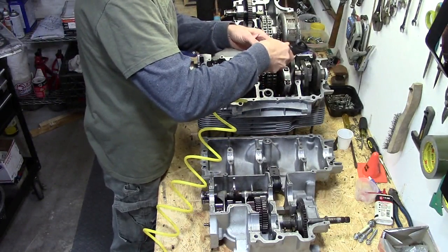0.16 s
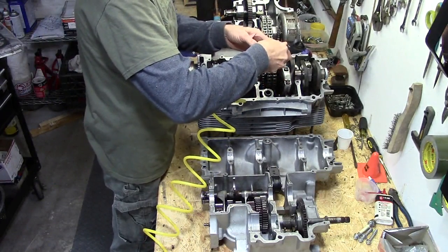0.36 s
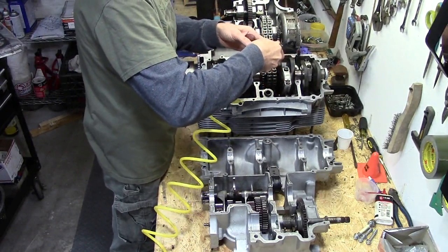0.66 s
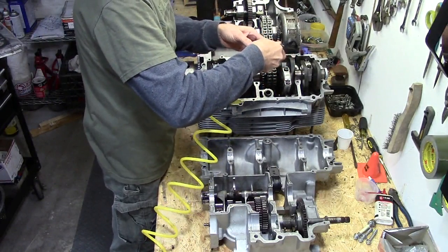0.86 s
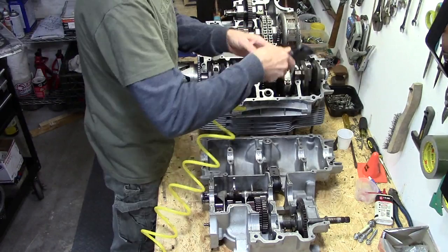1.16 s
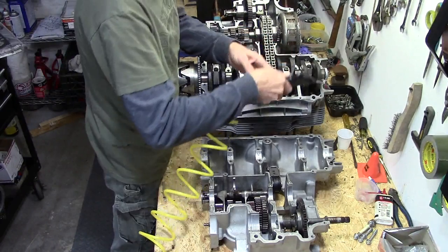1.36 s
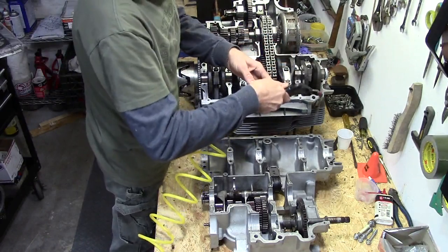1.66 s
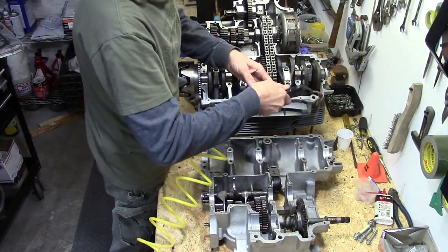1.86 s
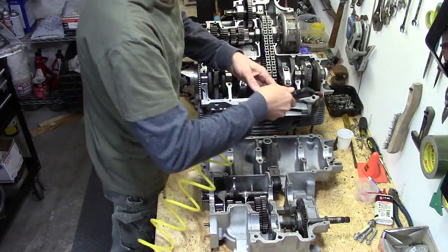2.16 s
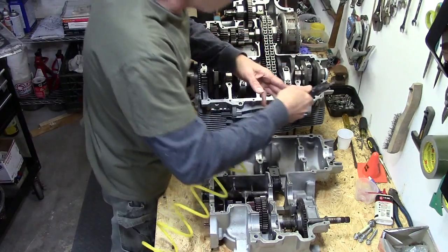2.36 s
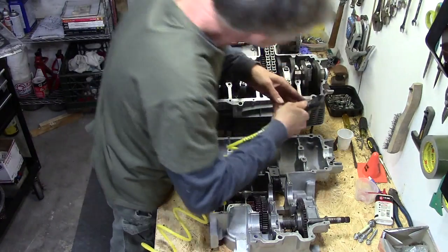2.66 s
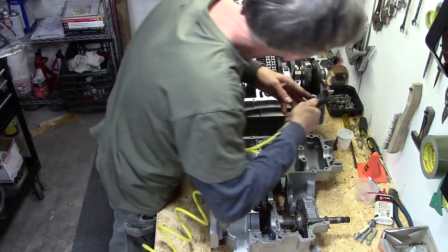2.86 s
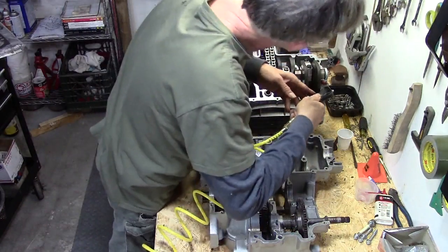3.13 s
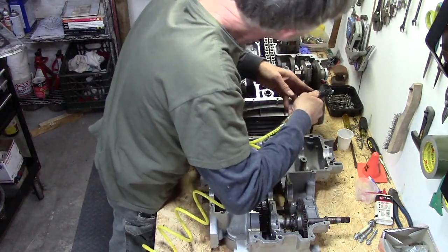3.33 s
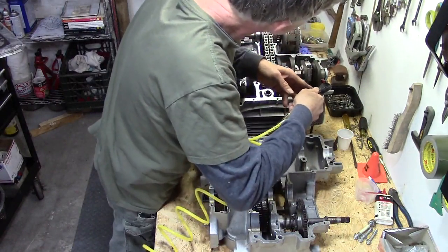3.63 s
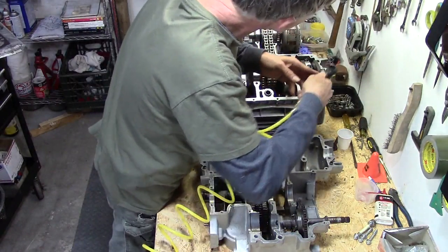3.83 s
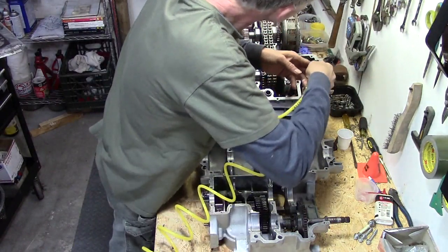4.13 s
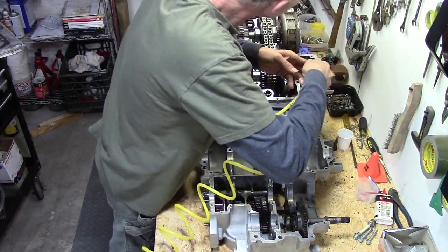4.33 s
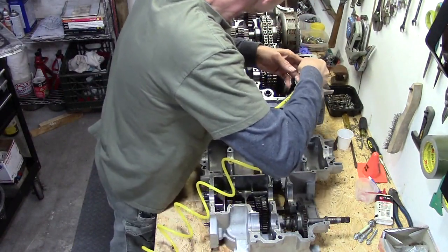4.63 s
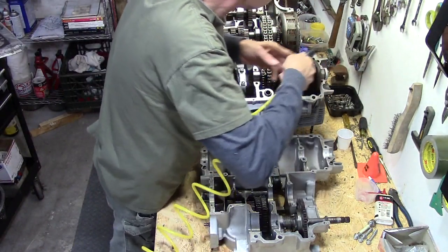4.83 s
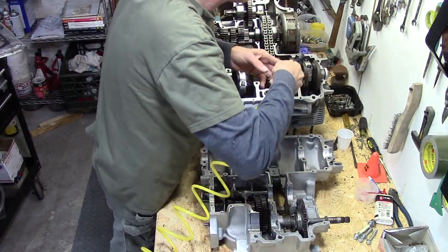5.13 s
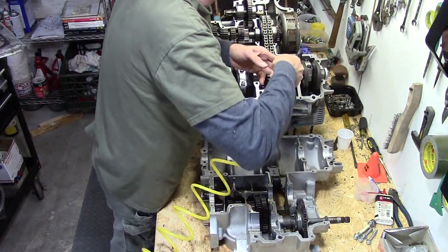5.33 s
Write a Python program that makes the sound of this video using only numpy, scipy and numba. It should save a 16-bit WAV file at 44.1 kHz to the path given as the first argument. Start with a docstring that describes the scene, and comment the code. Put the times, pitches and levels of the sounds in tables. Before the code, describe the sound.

Short blasts of compressed air hiss from a blow gun into a metal engine part, with brief whistles, in a small garage.

```python
"""Blow gun at a garage workbench

Short blasts of air clear the bores of an aluminium engine part. The jet hisses, rushes where it
strikes metal and rings the holes it crosses; square on a bore, it whistles. In the pauses a sleeve
brushes the bench and the nozzle taps the part. The small room holds each blast briefly, and the
limiter behind the stereo microphone ducks and swells back over a quiet hum."""
import sys
import numpy as np
from scipy import signal
from scipy.fft import rfft, irfft
from scipy.io import wavfile
from scipy.ndimage import uniform_filter1d, minimum_filter1d, map_coordinates
from numba import njit

SR = 44100
rng = np.random.default_rng(int(sys.argv[2]) if len(sys.argv) > 2 else 0)


def output_pcm(signal):
    """Save a mono or channel-first signal as 16-bit PCM at the path in sys.argv[1].

    Samples are clipped to [-1, 1] before scaling.
    """
    pcm = np.clip(np.atleast_2d(signal).T, -1, 1) * 32767
    wavfile.write(sys.argv[1], SR, np.round(pcm).astype(np.int16))


N = 241932
T = np.arange(N) / SR
HZ = np.maximum(np.arange(N // 2 + 1) * SR / N, 1)


def undb(db):
    """Decibels to gain."""
    return 10 ** (np.asarray(db) / 20)


def unit(x):
    """Scale to rms 1."""
    return x / np.sqrt(np.mean(x ** 2))


def curves(rows):
    """Each column after the first as a curve in time."""
    s, *columns = np.transpose(rows)
    return [np.interp(T, s, c) for c in columns]


def across(hz, points):
    """Read (Hz, value) points on a log-frequency axis."""
    f, value = np.transpose(points)
    return np.interp(np.log(hz), np.log(f), value)


def noise(gain):
    """White noise through a frequency response."""
    return irfft(rfft(rng.standard_normal(N)) * gain, N)


def resonance(hz, width_hz):
    """Response of two like resonators in series, gain 1 at the centre."""
    return 1 / (1 + 1j * (HZ ** 2 - hz ** 2) / (HZ * width_hz)) ** 2


def mode_power(modes, widen):
    """Power spectrum of a set of modes, their widths scaled."""
    return sum(np.abs(undb(db) * resonance(hz, widen * width_hz)) ** 2 for hz, width_hz, db in modes)


def walk(rate_hz):
    """Smooth random drift with a spread near 1."""
    k = int(SR / rate_hz)
    steps = np.repeat(rng.standard_normal(N // k + 1), k)
    return 1.6 * uniform_filter1d(uniform_filter1d(steps, k), k)[:N]


def bands(x, count=10):
    """Split a sound into overlapping bands that sum to it, each with its centre in Hz."""
    centres = np.geomspace(400, 16000, count)
    hz = np.maximum(np.arange(len(x) // 2 + 1) * SR / len(x), 1)
    spectrum = rfft(x)
    weights = [np.interp(np.log(hz), np.log(centres), row) for row in np.eye(count)]
    return [(centre, irfft(spectrum * weight, len(x))) for centre, weight in zip(centres, weights)]


# The nozzle's path over the part, one table a blast. Each row: time in seconds, gain from nearness
# in dB, slant in dB (negative is square on the metal, positive is grazing an edge).
AIM_SLOT = [(0.035, -2.5, 0.5), (0.075, -6.5, -4), (0.12, -2, 4), (0.165, 5.5, 0.5)]
AIM_FACE = [(0.28, -6, 0.5), (0.33, 2.5, -9.5), (0.39, 7, -5), (0.445, 9.5, 3.5), (0.52, -0.5, 1),
            (0.601, 3.5, 3), (0.68, 3.5, -1)]
AIM_RIM = [(0.72, 6.5, 9), (0.77, 3.5, 3), (0.88, 4.5, 1.5), (0.95, -6.5, -2), (1.019, -9.5, -4),
           (1.049, -6, -7)]
AIM_SWEEP = [(1.432, 1.5, 0), (1.48, -8.5, -11.5), (1.55, -4, 7), (1.66, -0.5, -0.5), (1.73, 6, 6.5),
             (1.83, -0.5, 4), (2.05, 0, -1), (2.13, -7.5, 3)]
AIM_BORE = [(3.22, -0.5, -1), (3.42, 0, 0), (3.51, 15.5, 4.5), (3.6, 21, 4), (3.65, 17, 3.5)]
AIM_PUFF = [(4.575, 0.032, -2), (4.639, 1, 1.5)]
AIM_STILL = [(0, 0.0028, 0.006)]
# Squeezes of the trigger. Each row: press, let-go, attack and brightening time in seconds,
# then strength, low rush and top sizzle in dB, then the nozzle's path.
BLASTS = [(-0.05, 0.178, 0.023, 0.062, -3.5, -5.5, -5, AIM_SLOT),
          (0.248, 0.718, 0.036, 0.043, -13.5, 4.5, -0.5, AIM_FACE),
          (0.694, 1.038, 0.024, 0.011, -5, 1, -2.5, AIM_RIM),
          (1.397, 2.204, 0.037, 0.2, -8, 1, 0.5, AIM_SWEEP),
          (3.166, 3.641, 0.051, 0.041, -15, -5, -8.5, AIM_BORE),
          (4.539, 4.673, 0.026, 0.017, -7, -0.5, -0.5, AIM_PUFF),
          (5.448, 5.6, 0.024, 0.038, -3.5, -10, -5, AIM_STILL)]


def jet(shut_s=0.0069, opening_dull_db=-17.5, sizzle_per_slant=0.4):
    """The valve opens dull, brightens and snaps shut; the aim trades rush for sizzle."""
    strength, rush_db, sizzle_db = 0, 0, 0
    for press_s, let_go_s, attack_s, brighten_s, db, low_db, top_db, aim in BLASTS:
        age = np.maximum(T - press_s, 0)
        near_db, slant_db = curves(aim)
        valve = np.minimum(age / attack_s, 1) ** 2 * np.exp(-np.maximum(T - let_go_s, 0) / shut_s)
        dull_db = opening_dull_db * np.exp(-age / brighten_s)
        strength = strength + valve * undb(db + near_db)
        rush_db = np.where(age > 0, low_db - slant_db, rush_db)
        sizzle_db = np.where(age > 0, top_db + dull_db + sizzle_per_slant * slant_db, sizzle_db)
    return strength, rush_db, sizzle_db


# The free jet on the casting. Each row: frequency in Hz, relative spectral level in dB.
JET_COLOUR = [(60, -26.5), (190, -17), (650, -9), (1000, -10.5), (1500, -9.5), (2050, -4), (2600, -2),
              (4000, -1), (6500, -1), (8500, 0.5), (10000, 4.5), (12000, 0.5), (14000, -2.5), (20000, -6.5)]
# Hollows of the engine case, rung by every blast. Each row: centre and nominal width in Hz, level in dB.
CASE_HOLLOWS = [(725, 45, -6), (1365, 120, -3.5), (1520, 58, -0.5), (1850, 60, -10.5)]


def hiss(rush_db, sizzle_db, flutter_db=0.66):
    """Turbulence: striking metal adds a low rush, a sharp edge adds sizzle; each eddy size flutters."""
    power = undb(across(HZ, JET_COLOUR)) ** 2 + mode_power(CASE_HOLLOWS, widen=1.356)
    out = 0
    for hz, band in bands(noise(np.sqrt(power))):
        rush_share = across(hz, [(1400, 0.85), (4500, 0.037)])
        sizzle_share = across(hz, [(6500, 0.2), (11500, 0.97)])
        out = out + band * undb(rush_share * rush_db + sizzle_share * sizzle_db + flutter_db * walk(60))
    return out


# Holes in the part, named for their likely shapes. Each row: centre and nominal width in Hz, level in dB.
HOLE_MODES = {"slot": [(4200, 270, 0), (5370, 150, 0.5), (6500, 740, 5)], "bolt hole": [(3398, 141, 7.5),
              (10110, 580, 4.5)], "pocket": [(1540, 200, 4), (3200, 860, 6)], "passage": [(2440, 220, 7.5),
              (4340, 250, 0.5)], "deep bore": [(2063, 260, 11), (2330, 123, 13.5), (3740, 500, 4),
              (5400, 200, 6.5), (6240, 400, 9), (9830, 640, 6.5)], "shallow bore": [(2080, 390, 5),
              (2930, 270, 6), (9300, 900, 5.5)], "narrow port": [(10100, 1100, 8.5), (11380, 1000, 4)]}
# The nozzle points into a hole. Each row: start and length in seconds, level in dB, which hole.
HOLE_VISITS = [(0, 0.17, 2, "slot"), (0.29, 0.1, -0.5, "pocket"), (0.39, 0.1, 0, "narrow port"),
               (0.44, 0.45, 1.5, "bolt hole"), (0.899, 0.14, 2.5, "bolt hole"),
               (1.402, 0.096, 1, "passage"), (1.602, 0.12, 4.5, "bolt hole"),
               (1.685, 0.058, 2, "narrow port"), (1.779, 0.31, -5, "bolt hole"),
               (1.845, 0.24, -3.5, "narrow port"), (3.157, 0.341, -1, "deep bore"),
               (3.505, 0.13, -4, "narrow port"), (4.538, 0.12, -6.5, "shallow bore"),
               (5.43, 0.055, 0.5, "shallow bore")]


def cavities(waver_db=1.5, fade_s=0.02):
    """Each hole picks its own notes out of the turbulence while the nozzle points at it."""
    out = 0
    for name, modes in HOLE_MODES.items():
        aim = sum(undb(db) * np.clip(np.minimum(T - s, s + length_s - T) / fade_s + .5, 0, 1)
                  for s, length_s, db, hole in HOLE_VISITS if hole == name)
        out = out + aim * noise(np.sqrt(mode_power(modes, widen=1.57)))
    return out * undb(waver_db * walk(50))


def blow_gun(hiss_db=-2, cavity_db=-2.5):
    """One jet drives the hiss and the cavities."""
    strength, rush_db, sizzle_db = jet()
    return strength * (undb(hiss_db) * hiss(rush_db, sizzle_db) + undb(cavity_db) * cavities())


# Room tone around the microphone. Each row: frequency in Hz, relative spectral level in dB.
ROOM_COLOUR = [(18, -43.5), (30, -9), (69, -12), (213, -9.5), (270, -8), (359, -11.5), (389, -6),
               (455, -11), (532, -12), (808, -14), (897, -16), (1400, -18), (3320, -26.5), (15500, -40)]
# Low hum in the garage, perhaps a fan and the mains. Each row: frequency in Hz, rms level in dB.
ROOM_HUM = [(59.9, -65), (75.4, -62), (120, -68), (253, -67.5), (360.7, -66)]


def room_tone(air_db=-49, hum_waver_db=2.0):
    """Soft air noise, wider in the bass, with a wavering hum."""
    colour = undb(across(HZ, ROOM_COLOUR))
    width = undb(across(HZ, [(35, 1.5), (70, -2.0), (130, 0.5), (300, -4.5), (700, -8.5), (4000, -8)]))
    air = unit(noise(colour) + noise(colour * width) * np.array([[1], [-1]]))
    hum = 0
    for hz, db in ROOM_HUM:
        amplitude = np.sqrt(2) * undb(db + hum_waver_db * walk(4.3))
        hum = hum + amplitude * np.sin(2 * np.pi * hz * T + .5 * walk(2.0))
    return undb(air_db) * air + hum


# A bore whistles on its first or third mode. Each row: peak time and half length in seconds,
# pitch in Hz, glide in Hz per second, level in dB.
BORE_WHISTLES = [(0.148, .014, 4200, 1000, -13), (0.446, 0.0085, 3354, -12000, -5.5),
                 (0.463, 0.0097, 10100, -17000, 18), (0.491, 0.0084, 3482, -2000, 9),
                 (0.669, .014, 3334, 6512.5, 4.5), (.82, .013, 10180, 19998.5, 3.5),
                 (0.941, 0.013, 3390, -9000, 6), (1.075, .055, 3380, -100, -23.5),
                 (1.666, 0.016, 3387, 5000, -12), (1.7, 0.018, 10300, -8000, -8)]


def whistles(wobble_hz=35):
    """The jet locks to a bore for an instant; the pitch slides as the nozzle moves past."""
    out = 0
    for peak_s, half_s, hz, glide, db in BORE_WHISTLES:
        from_peak = np.clip(T - peak_s, -5 * half_s, 5 * half_s)
        pitch = hz + glide * from_peak + wobble_hz * walk(300)
        swell = undb(db) * np.exp(-(from_peak / half_s) ** 2)
        out = out + swell * np.sin(2 * np.pi * np.cumsum(pitch) / SR)
    return out


# A sleeve on the bench, faint at the microphone. Each row: time in seconds, level in dB.
SLEEVE_BRUSH = [(2.45, -69.5), (2.56, -50.5), (2.66, -48.5), (2.73, -52.5), (2.82, -55.5), (2.95, -72.5)]


def sleeve():
    """Cloth rubs softly and a little unevenly."""
    colour = undb(across(HZ, [(200, 5), (1200, 2), (3000, -3.5), (7500, -9), (12000, -20.5)]))
    return unit(noise(colour)) * undb(curves(SLEEVE_BRUSH)[0] + walk(90))


# The nozzle touches the part. Each row: start in seconds, level in dB, the tick's relative level
# in dB, its centre in Hz.
NOZZLE_TAPS = [(2.852, -35, 3, 1980), (5.249, -60.5, 12, 6980)]
# The aluminium casting. Each row: frequency in Hz, level in dB, seconds to fall by 60 dB.
CASTING_MODES = [(1126, 7, 0.042), (1470, 4.5, 0.049), (2660, -8, 0.018), (3160, -0.5, 0.038),
                 (3810, 0.5, 0.023), (8000, -8, .03)]


def taps(tick_s=0.011, ring_db=-6):
    """A short scrape of contact, then the hand-damped casting rings."""
    out = 0
    for start_s, db, tick_db, tick_hz in NOZZLE_TAPS:
        age = np.maximum(T - start_s, 0)
        ring = sum(undb(mode_db - 60 * age / t60) * np.sin(2 * np.pi * hz * age)
                   for hz, mode_db, t60 in CASTING_MODES)
        tick = (T > start_s) * np.exp(-age / tick_s) * noise(resonance(tick_hz, 1.5 * tick_hz))
        out = out + undb(db) * (undb(ring_db) * ring + undb(tick_db) * tick)
    return out


def reflections(x, wet_db=-5.5, near_db=-7, near_s=.003, sway_s=.0002, side_db=-19.0):
    """The nearby bench and wall scatter the treble at once; the garage rings on, its top dying first."""
    age = T[:SR * 3 // 4]
    t60 = [(300, 0.33), (1500, 0.69), (3300, 0.49), (5500, 0.55), (10000, 0.3), (15000, 0.2984)]
    treble = signal.butter(2, 2500, "high", fs=SR, output="sos")
    heard = []
    for _ in range(2):
        diffuse = bands(rng.standard_normal(len(age)))
        tail = sum(band * undb(-60 * age / across(hz, t60)) for hz, band in diffuse)
        tail = tail * (1 - np.exp(-age / 0.0053))
        scatter = rng.standard_normal(len(age)) * np.exp(-age / near_s) * (age > .001)
        near = signal.sosfilt(treble, scatter)
        response = (undb(wet_db) * unit(tail) + undb(near_db) * unit(near)) / np.sqrt(len(age))
        # Hands and nozzle move, so the echo paths to the microphone vary and the hiss phases gently.
        place = (T + sway_s * walk(5)) * SR
        heard.append(map_coordinates(signal.fftconvolve(x, response)[:N], [place], order=3))
    mid, side = heard
    # The room sound is nearly mono, narrowest in the midrange and a little wider in bass and treble.
    width_db = across(HZ, [(400, 8.5), (1200, -20), (2600, -28.5), (5000, 1), (8000, 2.5), (13000, 1)])
    side = irfft(rfft(side) * undb(side_db + width_db), N)
    return mid + side * np.array([[1], [-1]])


def scene(work_db=-2, whistle_room_db=-9):
    """The bench is dead centre. Hiss fills the garage; whistles beam from the bores and stir it less."""
    bench = blow_gun() + taps() + sleeve()
    whistle = whistles()
    room = reflections(bench + undb(whistle_room_db) * whistle)
    return undb(work_db) * (bench + whistle + room) + room_tone()


@njit
def peak_follower(x, attack, hold, release):
    """Rises quickly to each peak, holds it, then falls back."""
    out, level, wait = np.empty(len(x)), 0., 0.
    for i in range(len(x)):
        if x[i] > level:
            level += attack * (x[i] - level)
            wait = hold
        elif wait > 0:
            wait -= 1
        else:
            level *= release
        out[i] = level
    return out


def record(dry, ceiling_db=-6, attack_s=0.0001, hold_s=0.012, release_db_per_s=160,
           lag_s=0.011, settle_db=2.0, preamp_offset=0.0091):
    """Behind the microphone a fast limiter catches peaks, a slower gain follows, and the top is cut."""
    attack = 1 - np.exp(-1 / (attack_s * SR))
    release = float(undb(-release_db_per_s / SR))
    peak = peak_follower(np.abs(dry).max(axis=0), attack, float(hold_s * SR), release)
    # The slow stage reacts late, so it still ducks just after a blast has stopped.
    slow = np.interp(T - lag_s, T, uniform_filter1d(peak, SR // 25), left=0)
    overshoot = np.maximum(peak, undb(settle_db) * slow) / undb(ceiling_db)
    gain = minimum_filter1d(1 / np.maximum(overshoot, 1), SR // 500)  # looks a millisecond ahead
    top_cut = signal.ellip(10, .1, 70, 15850, fs=SR, output="sos")
    # The preamplifier's small offset is ducked too, which thumps faintly.
    return signal.sosfilt(top_cut, (dry + preamp_offset) * gain)


dry = scene()
out = record(dry)
output_pcm(out)
```